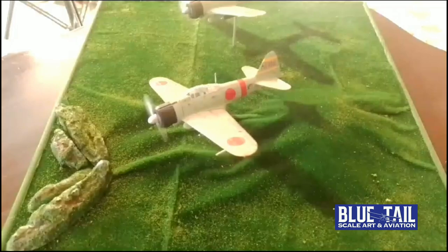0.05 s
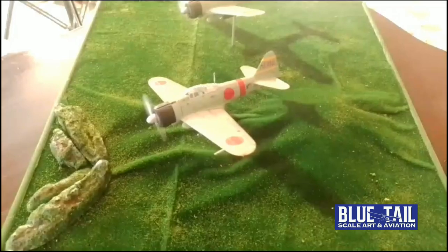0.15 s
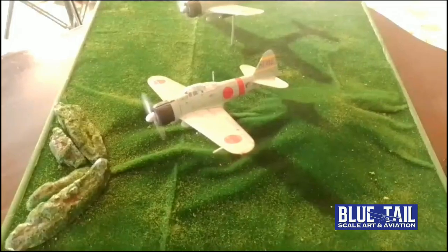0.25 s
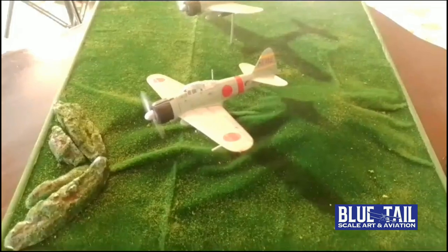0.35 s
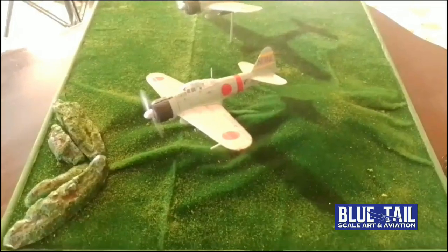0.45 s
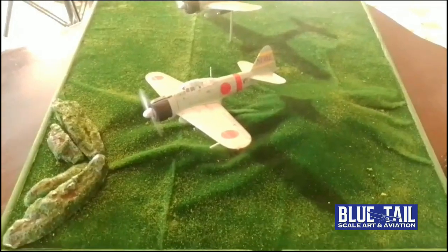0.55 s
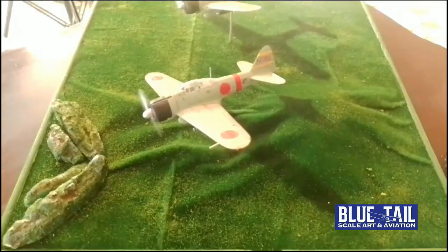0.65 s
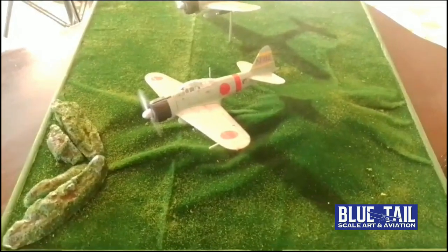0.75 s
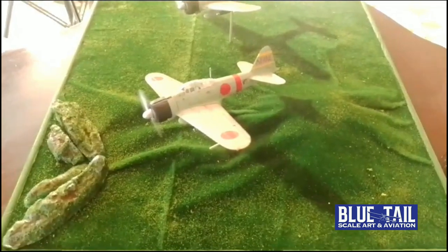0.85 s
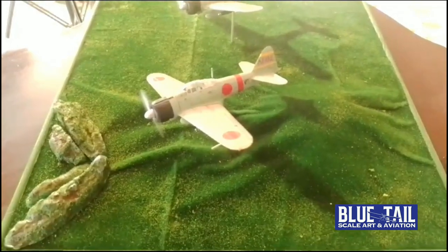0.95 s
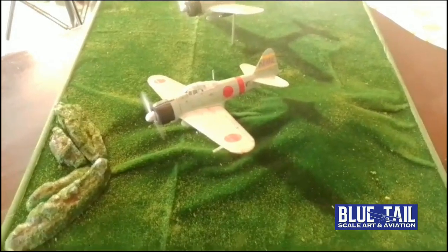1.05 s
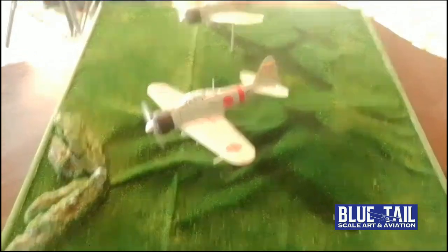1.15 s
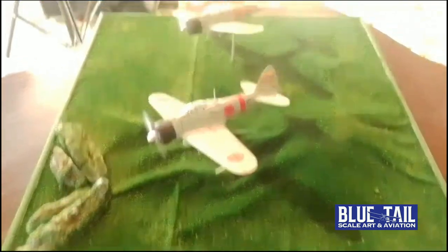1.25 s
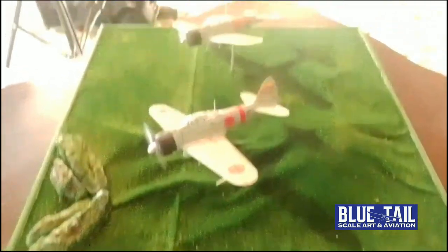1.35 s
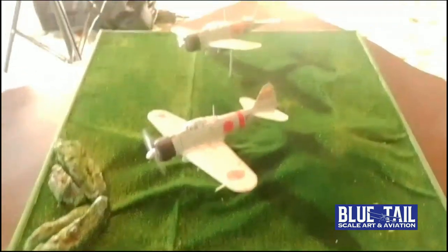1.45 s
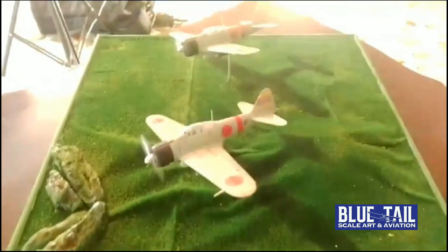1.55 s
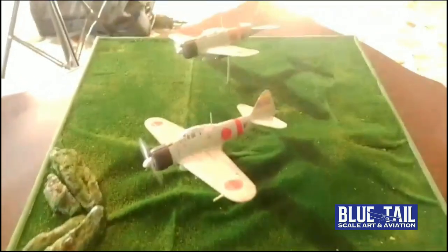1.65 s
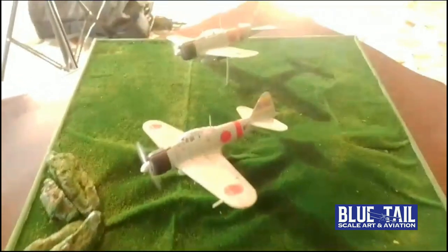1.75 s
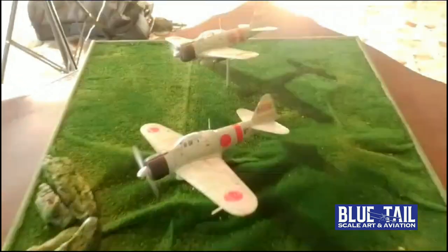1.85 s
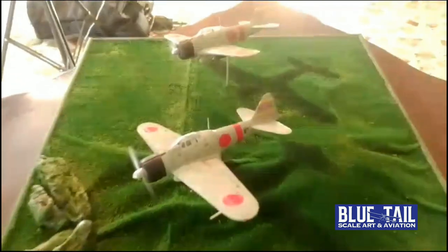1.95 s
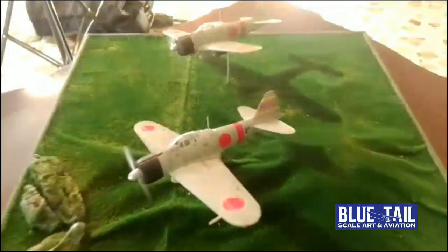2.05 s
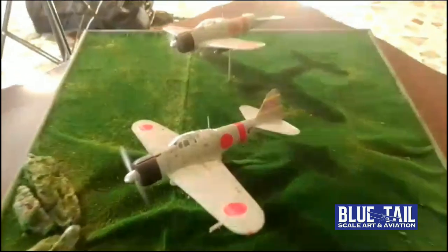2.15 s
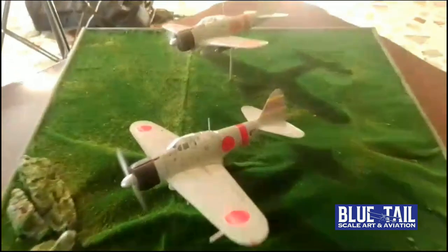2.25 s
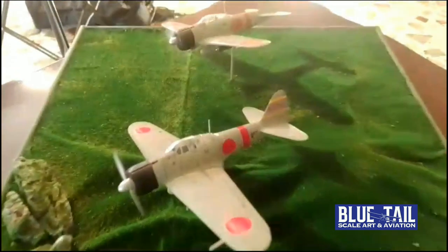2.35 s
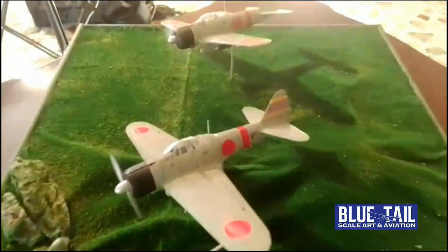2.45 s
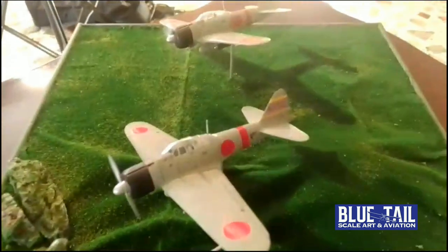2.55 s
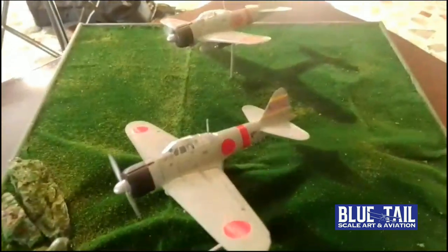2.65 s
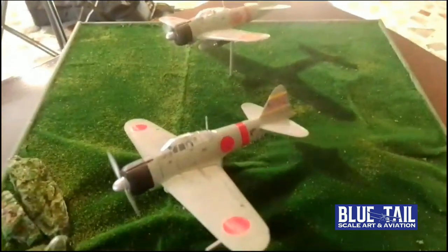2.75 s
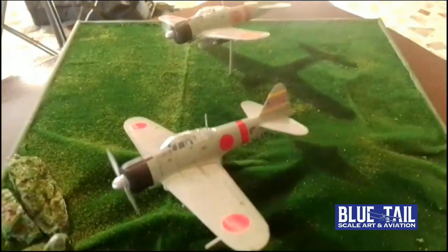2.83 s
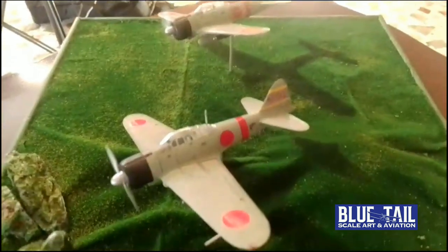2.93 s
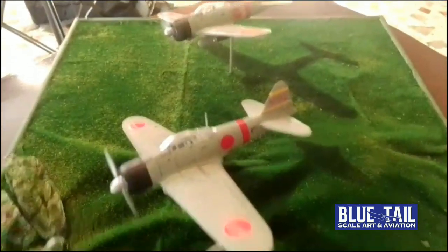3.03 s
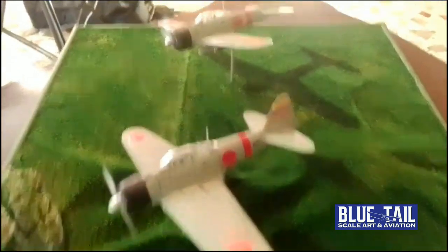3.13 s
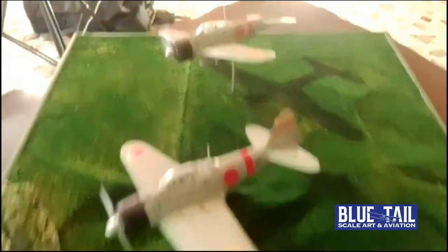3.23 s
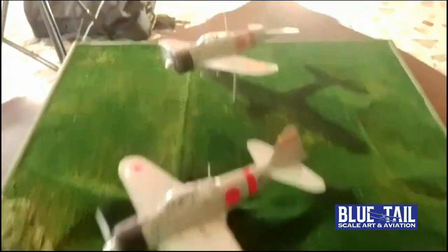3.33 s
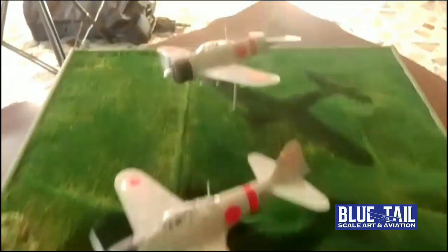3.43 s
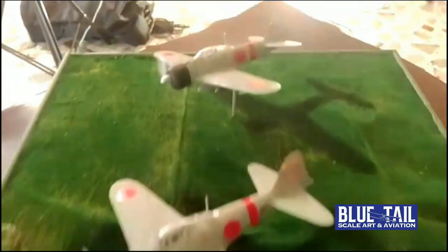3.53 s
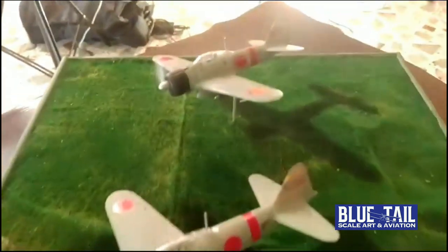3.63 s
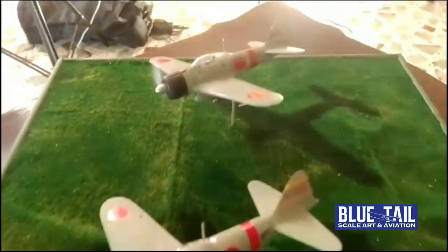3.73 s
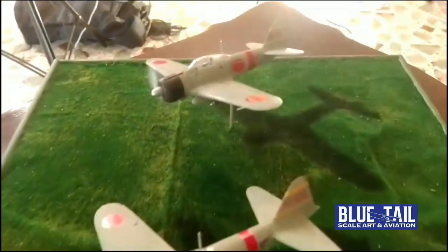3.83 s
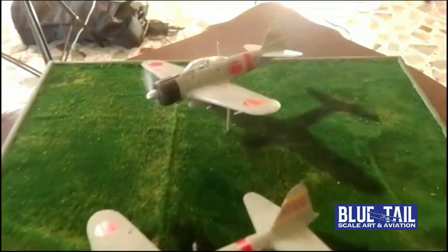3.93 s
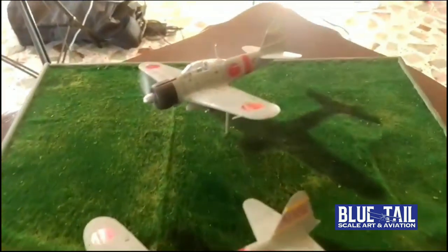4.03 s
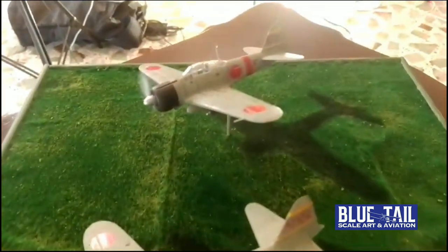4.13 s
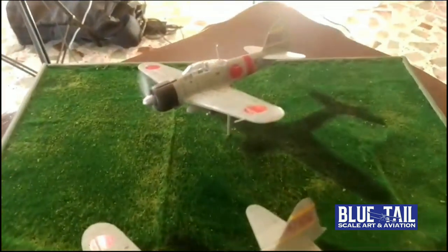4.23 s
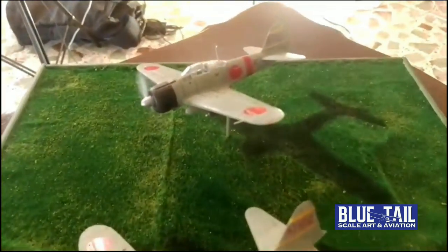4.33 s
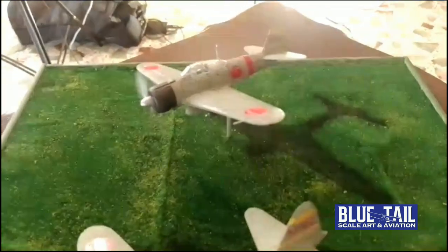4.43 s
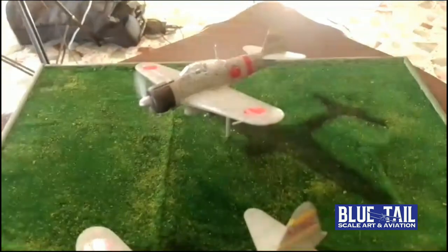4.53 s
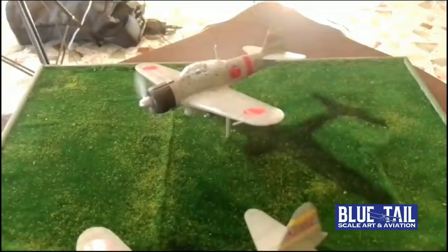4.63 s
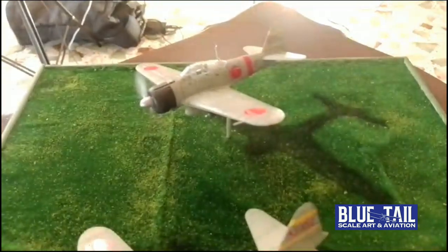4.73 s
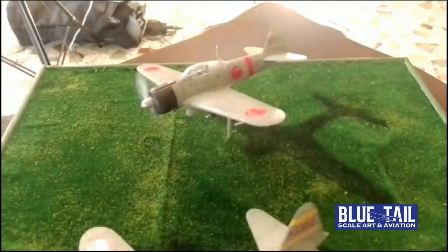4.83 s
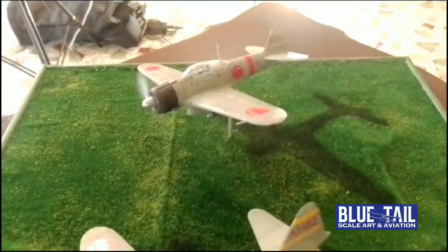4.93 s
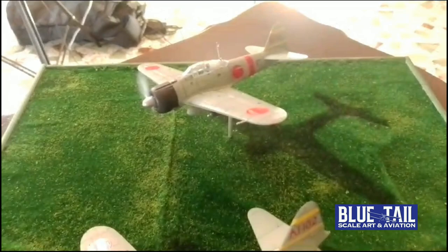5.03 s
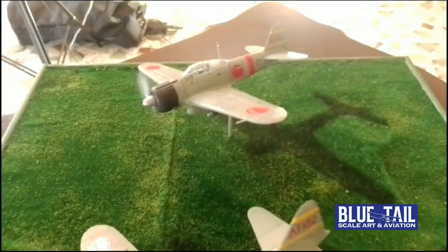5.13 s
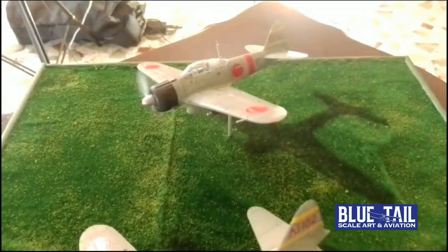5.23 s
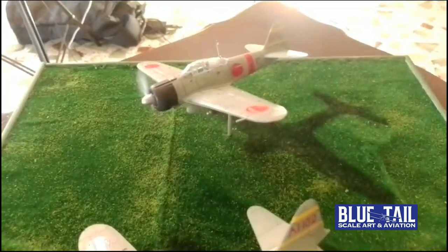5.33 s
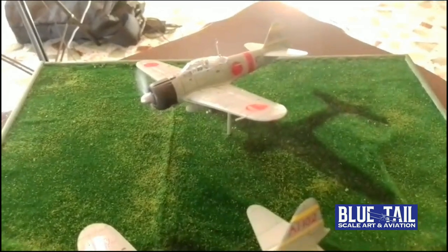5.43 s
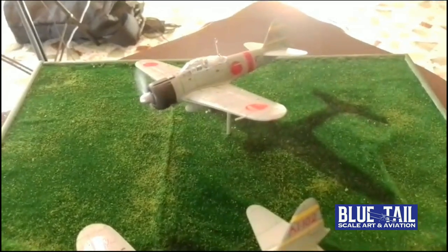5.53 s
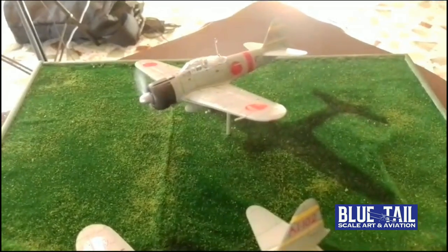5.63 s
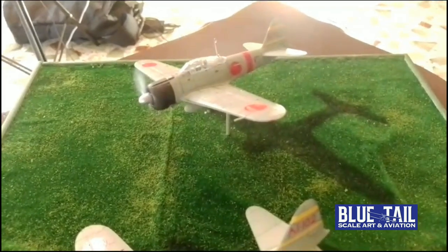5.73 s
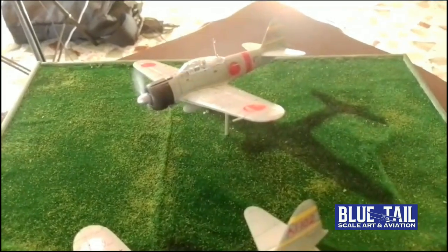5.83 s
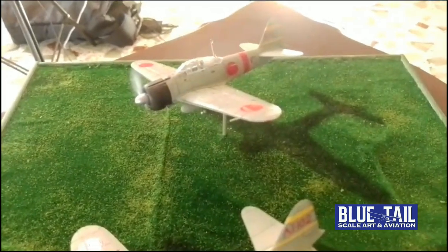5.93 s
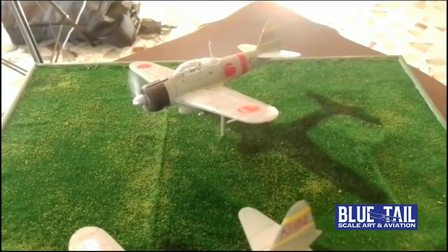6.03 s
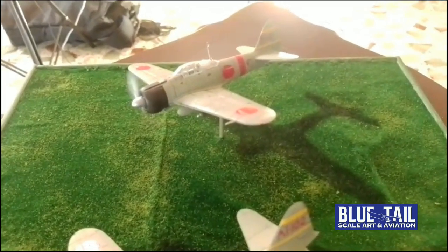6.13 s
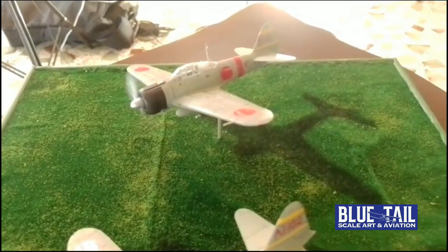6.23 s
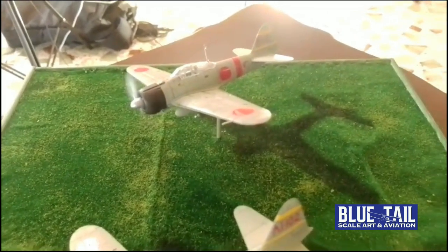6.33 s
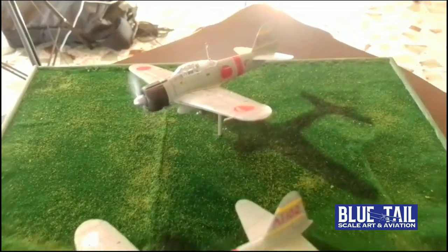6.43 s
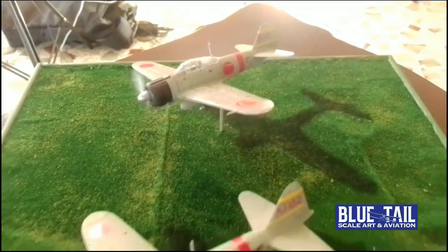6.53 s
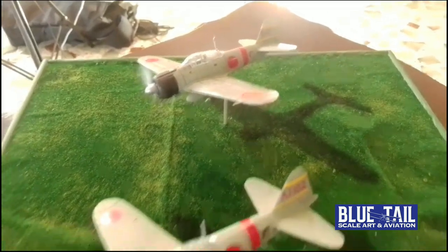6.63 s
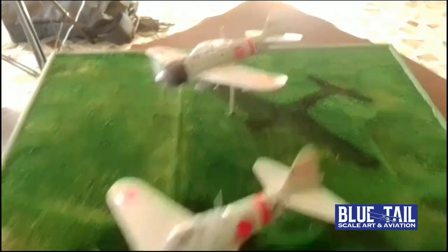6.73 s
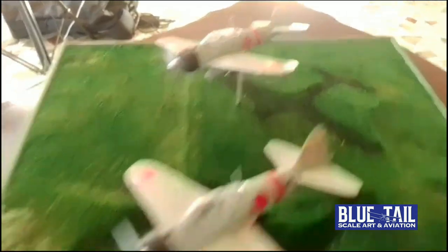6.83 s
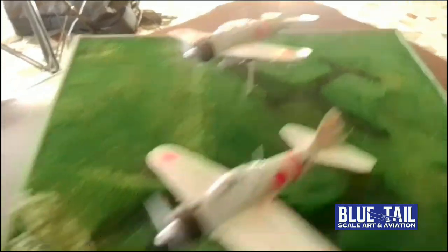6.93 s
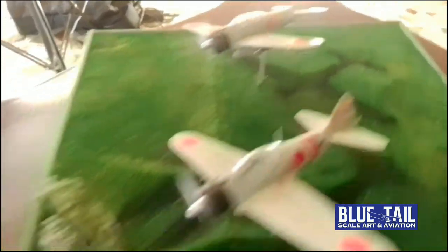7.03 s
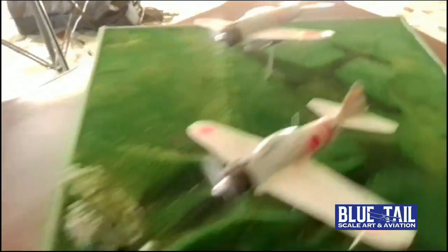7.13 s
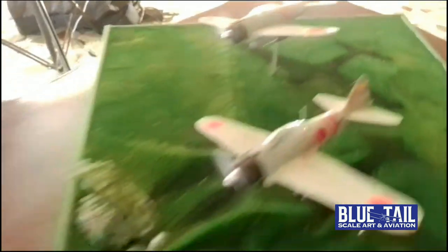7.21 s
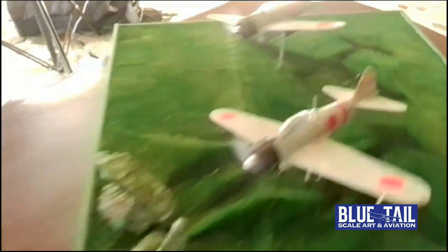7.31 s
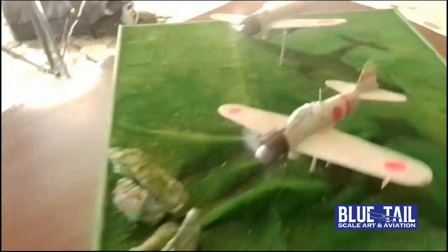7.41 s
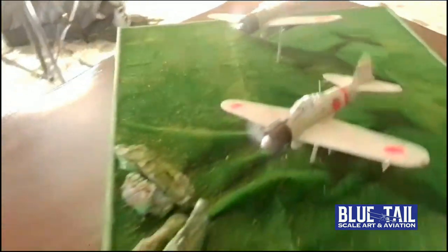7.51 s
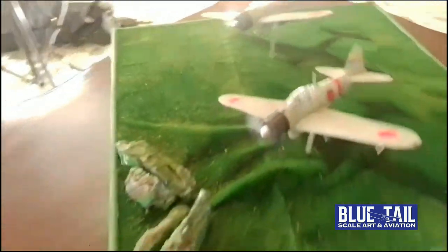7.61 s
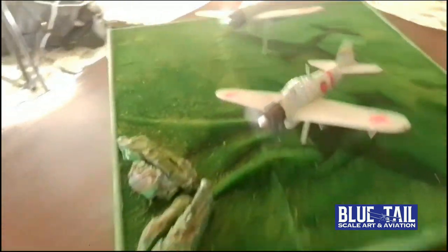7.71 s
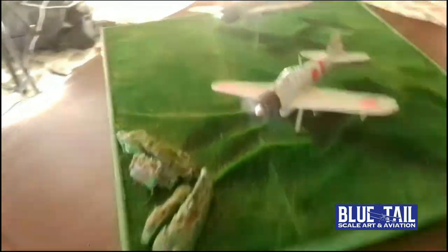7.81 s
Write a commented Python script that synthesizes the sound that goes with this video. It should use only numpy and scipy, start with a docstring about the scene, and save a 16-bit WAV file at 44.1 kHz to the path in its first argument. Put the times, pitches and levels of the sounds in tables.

```python
"""A small, quiet room, close to two plastic model aircraft whose propellers spin on electric motors.
Each shaft knocks and scrapes in its bearing on every turn and rings the thin shell of its model:
a bright buzz with a faint whine from the fast one, a coarser rattle from the slow one.
As the microphone moves over them, different parts of the shells come into earshot.
Now and then a shudder shakes the stand and the motor mount."""
import sys
import numpy as np
from scipy import signal
from scipy.io import wavfile
from scipy.ndimage import uniform_filter1d

SR = 44100
rng = np.random.default_rng(int(sys.argv[2]) if len(sys.argv) > 2 else 0)


def pcm_store(signal):
    """Save signal as 16-bit PCM."""
    levels = np.round(np.clip(np.atleast_2d(signal), -1, 1) * 32767)
    wavfile.write(sys.argv[1], SR, levels.astype(np.int16).T)


N = 347067
TIME = np.arange(N) / SR


def fast_model(shudder):
    """One contact a turn: it scrapes in the motor can, hisses in the brushes and knocks on the shell."""
    # Shaft speed (time [s], speed [turns/s])
    shaft_speed = [(0.7, 126.8), (1.72, 126.9), (1.9, 129.3), (2.0, 135), (3.85, 134.3), (3.97, 136.5),
                   (4.2, 132.6), (5.5, 133.3), (5.65, 138.3), (5.8, 139.3), (6.35, 137.5), (6.52, 134.5),
                   (6.75, 133.9), (7.08, 135.1), (7.45, 140.5), (7.65, 138.9), (7.87, 139.5)]
    # Levels of motor can and brushes over time (time [s], level [dB])
    can_db = [(0.7, -26.5), (1.3, -26), (1.7, -23), (2.08, -31.5), (3.1, -35), (3.62, -24.5), (3.9, -34),
              (4.4, -27.5), (6.8, -29), (6.98, -21), (7.11, -32), (7.24, -24), (7.4, -26.5), (7.87, -23)]
    brush_db = [(0.7, -33.5), (1.3, -35.5), (1.9, -34), (2.1, -39), (3.2, -37), (4, -36.5), (5, -29.5),
                (7.87, -37)]
    # Resonances of each part (pitch [Hz], width [Hz], level [dB])
    can_modes = [(11607, 630, -0.5), (11890, 150, -17)]
    brush_modes = [(12520, 4770, 3), (9710, 4200, -3.5)]
    mount_modes = [(4334, 80, -1.5), (4540, 120, -11)]
    spinner_modes = [(14470, 680, 0.5), (12300, 600, -25)]
    hub_modes = [(12530, 460, -0.84)]
    wing_modes = [(8870, 400, 2), (8530, 420, -17), (9450, 560, -11), (5205, 102, -8), (5200, 310, -23),
                  (5860, 150, -9.5), (11100, 280, -6), (847, 45, -17.5), (1540, 97, -46)]
    flap_modes = [(5944, 140, 0), (10620, 150, 2.5), (1484, 130, -16)]
    cowl_modes = [(9314, 130, 1), (8830, 190, -4), (5805, 150, -1.5)]
    nose_modes = [(4280, 520, -3), (3690, 160, -8.5)]
    speed = curve(shaft_speed)
    turns = np.cumsum(speed * (1 + .003 * wander())) / SR
    once = [(0, 0)]
    scraping = rattle(turns, once, jitter=.0253, scatter_db=1.5, scrape_ms=.7, knock_db=-2.5, rub=.84)
    sliding = rattle(turns, once, jitter=.02, scatter_db=3.5, scrape_ms=1, knock_db=-23, rub=.97)
    tapping = rattle(turns, once, jitter=.025, scatter_db=1.9, scrape_ms=.25, knock_db=9, rub=.2)
    tight = rattle(turns, once, jitter=.0035, scatter_db=.3, scrape_ms=.98, knock_db=3.5, rub=.17)
    can = ring(scraping, can_modes) * undb(curve(can_db))
    brushes = ring(sliding, brush_modes) * undb(curve(brush_db))
    mount = ring(tight, mount_modes) * np.hypot(heard("mount"), shudder)
    # As the shaft speeds up, the buzz shifts from the spinner to the hub.
    overspeed = speed - 133
    spinner = ring(tapping, spinner_modes) * heard("spinner", edge=3.4) * undb(-1.6 * overspeed)
    hub = ring(tapping, hub_modes) * heard("hub") * undb(.5 * overspeed)
    parts = [(tight, wing_modes, "wing"), (tight, flap_modes, "flap"),
             (tight, cowl_modes, "cowl"), (tapping, nose_modes, "nose")]
    loose = sum(ring(drive, modes) * heard(part) for drive, modes, part in parts)
    return can + brushes + mount + spinner + hub + loose + whine(turns)


def slow_model(shudder):
    """Three uneven contacts a turn over a rubbing hiss; the stand takes the blows, loose parts chatter."""
    # Shaft speed (time [s], speed [turns/s])
    shaft_speed = [(0.7, 56.6), (2, 57.17), (2.9, 57.73), (4.4, 58.27), (5.3, 57.85), (5.7, 58.83),
                   (6.6, 58.68), (7.3, 59.77), (7.87, 59.48)]
    # Where the shaft strikes (position [turns], level [dB])
    contacts = [(0, -5.5), (.44, -5), (.56, -8.5)]
    # Level of the bearing and its hiss over time (time [s], level [dB])
    bearing_db = [(0.7, -29.5), (2.1, -30.5), (2.9, -29), (7.87, -28.5)]
    # Resonances of each part (pitch [Hz], width [Hz], level [dB])
    bearing_modes = [(8070, 670, -3.5), (7386, 423, -7), (6846, 406, -6), (3702, 113, -27),
                     (1330, 274, -29), (1740, 106, -38), (805.5, 62, -26.5)]
    rubbing_modes = [(7685, 2200, -10), (4920, 2620, -18), (2030, 2400, -29), (552, 310, -37.5)]
    stand_modes = [(516.3, 54, -1), (406.8, 21.5, -12), (410, 306, -20)]
    fuselage_modes = [(1380.5, 80, 1.5), (1707, 46, -5.5), (2057, 137, -5.5), (1061, 30, -19),
                      (3630, 110, -11), (4026, 140, -8.5)]
    wheel_modes = [(4430, 280, -4.5), (3197, 30, -6.5), (3605, 90, -2), (2590, 12, -19), (3050, 24, -21)]
    tail_modes = [(10560, 315, -0.5), (5975, 160, -6.5), (5500, 110, -14.5), (11410, 620, 3.5)]
    canopy_modes = [(12960, 460, -0.5), (11600, 140, -24)]
    strut_modes = [(4990, 180, 0.46), (8300, 370, 0.00038)]
    turns = np.cumsum(curve(shaft_speed)) / SR
    shaft = rattle(turns, contacts, jitter=.0121, scatter_db=2, scrape_ms=.6, knock_db=1.5, rub=.7)
    rubbing = rattle(turns, contacts, jitter=.027, scatter_db=3, scrape_ms=1, knock_db=-32, rub=2.5)
    blows = rattle(turns, contacts, jitter=.015, scatter_db=3, scrape_ms=.74, knock_db=-1, rub=.31)
    chatter = rattle(turns, contacts, jitter=.0181, scatter_db=2.5, scrape_ms=.47, knock_db=-3, rub=.58)
    bearing = ring(shaft, bearing_modes) + ring(rubbing, rubbing_modes)
    bearing *= undb(curve(bearing_db)) * waver(depth_db=.5)
    stand = ring(blows, stand_modes) * np.hypot(heard("stand", waver_db=2.5), shudder)
    parts = [(fuselage_modes, "fuselage"), (wheel_modes, "wheels"), (tail_modes, "tail"),
             (canopy_modes, "canopy"), (strut_modes, "strut")]
    loose = sum(ring(chatter, modes) * heard(part) for modes, part in parts)
    return bearing + stand + loose


def rattle(turns, contacts, jitter, scatter_db, scrape_ms, knock_db, rub):
    """Each contact gives a knock and a scrape that swells and dies; the shaft rubs on in between."""
    hits = sum(undb(db) * knocks(turns, position, jitter, scatter_db) for position, db in contacts)
    pole = np.exp(-1000 / (scrape_ms * SR))
    pressure = unit(signal.lfilter([1], np.poly([pole, pole]), hits))
    scrape = unit((pressure + rub) * rng.standard_normal(N))
    return scrape + undb(knock_db) * unit(hits)


def knocks(turns, position, jitter, scatter_db):
    """One sharp click a turn, a little early or late (position and jitter in turns)."""
    count = int(turns[-1])
    late, size = rng.standard_normal((count, 2)).T
    gain = undb(scatter_db * np.minimum(size, 1.7))  # no single knock is much louder than the rest
    at = np.interp(np.arange(count) + position + jitter * late, turns, np.arange(N))
    taps = at.astype(int)[:, None] + np.arange(-7, 9)
    offset = taps - at[:, None]
    click = np.sinc(offset) * np.cos(np.pi * offset / 16) ** 2  # can land between samples
    return np.bincount(taps.ravel() % N, (click * gain[:, None]).ravel(), N)


def ring(drive, modes):
    """Clusters of close modes ring as steep-sided bands, each at its own level."""
    out = 0
    for hz, width, db in modes:
        edges = np.clip([hz - width / 2, hz + width / 2], 40, .45 * SR)
        band = signal.butter(4 if width > 280 else 2, edges, "bandpass", fs=SR, output="sos")
        out = out + undb(db) * unit(signal.sosfilt(band, drive))
    return out


def heard(part, waver_db=1, edge=6.1):
    """A part's wavering gain at the moving microphone; a higher edge fades faster outside its spots."""
    # The microphone goes from one model to the other, lingers, and swings back to one side.
    # (time [s], along [0-1], aside [0-1])
    mic_path = [(0.7, 0, 0), (1.1, .03, 0), (1.75, .19, 0), (2.0, .31, 0), (2.5, .42, 0), (3.2, .5, 0),
                (3.6, .65, 0), (3.95, .76, 0), (4.3, .89, 0), (4.8, .99, 0), (6.1, .98, 0), (6.5, .92, .05),
                (6.8, .73, .17), (7.0, .53, .3), (7.25, .38, .48), (7.5, .28, .65), (7.87, .2, .8)]
    # Sweet spots (part, along [0-1], aside [0-1], radius [0-1], level [dB])
    spots = [("mount", 0.086, 0, 0.14, -47), ("mount", 0.522, 0, 0.21, -45.5),
             ("mount", 0.52, 0.33, 0.3, -40.5), ("wing", 0.012, 0, .18, -34), ("flap", .14, 0, 0.088, -41),
             ("cowl", 0.56, 0, .21, -40.5), ("cowl", .63, 0.25, 0.12, -39), ("cowl", .26, .65, 0.22, -52.5),
             ("spinner", 0.98, 0, 0.095, -23.5), ("spinner", .7, 0, .06, -39), ("hub", .92, 0, .27, -31),
             ("hub", .18, .82, .13, -28.5), ("hub", .52, .31, 0.16, -38), ("nose", 0.43, 0.384, 0.18, -38),
             ("fuselage", 0.95, 0, 0.19, -47.5), ("fuselage", 0.695, 0.26, 0.18, -53),
             ("wheels", .99, 0.0092, 0.053, -47), ("tail", 0.95, 0, .19, -34.5),
             ("tail", 0.715, 0, 0.06, -46.5), ("tail", 0.63, 0.24, 0.23, -41),
             ("canopy", 0.866, 0, 0.24, -26), ("canopy", 0.17, .82, 0.16, -21.5),
             ("strut", 0.26, .7, 0.24, -41), ("stand", 0.49, 0.17, 0.65, -61.5),
             ("stand", .98, 0, .08, -58), ("whine 7", 0.065, 0, 0.14, -49),
             ("whine 7", 0.59, 0, .28, -58.5), ("whine 7", .55, .31, 0.14, -53.5),
             ("whine 11", .85, 0, 0.066, -54), ("whine 11", 0.87, 0, 0.11, -65),
             ("whine 11", 0.71, 0.29, 0.23, -47.5), ("whine 12", .11, 0, 0.14, -58)]
    times, along, aside = np.transpose(mic_path)
    place = np.interp(TIME, times, along + 1j * aside)
    power = sum(undb(db) ** 2 / (1 + np.abs((place - x - 1j * y) / radius) ** (2 * edge))
                for name, x, y, radius, db in spots if name == part)
    return np.sqrt(power) * waver(waver_db)


def whine(turns):
    """Thin, clean tones at multiples of the shaft rate, which flutters slightly."""
    flutter = unit(signal.sosfilt(signal.butter(2, 25, fs=SR, output="sos"), rng.standard_normal(N)))
    angle = 2 * np.pi * (turns + .0096 * flutter)
    tone = {order: np.sqrt(2) * np.sin(order * angle) for order in (7, 8, 11, 12, 15)}
    low = tone[7] * heard("whine 7") + tone[8] * undb(-67.5)
    middle = tone[11] * heard("whine 11")
    high = (tone[12] + tone[15] * undb(-8)) * heard("whine 12")
    return low + middle + high


def shudders():
    """Gains for the stand and the motor mount: each shudder swells and dies evenly."""
    # Shudders (middle [s], length [s], stand level [dB], mount level [dB])
    shakes = [(1.66, 0.19, -60, -43), (2.32, 0.25, -61, -44.5), (3.437, .08, -53, -44),
              (3.637, .08, -51.5, -56), (3.976, .08, -54, -58), (4.186, 0.052, -51, -56),
              (4.83, 0.19, -44.5, -46), (5.106, 0.13, -50.5, -48), (5.52, 0.17, -55, -41.5),
              (5.758, 0.16, -50.5, -52), (5.99, 0.12, -51, -54), (6.21, 0.11, -53, -58),
              (7.074, .1, -55, -45)]
    return sum(np.outer(undb(levels), np.exp(-(2 * (TIME - middle) / length) ** 2))
               for middle, length, *levels in shakes)


def room(x, t60_s, wet_db):
    """The small room answers with a short tail."""
    t = TIME[:SR // 2]
    tail = rng.standard_normal(len(t)) * np.exp(-np.log(1000) * t / t60_s) * (t > .004)
    return x + undb(wet_db) * signal.fftconvolve(x, tail / np.linalg.norm(tail))[:N]


def room_tone():
    """A very faint, low bed of air."""
    return ring(rng.standard_normal(N), [(324.4, 208, -72.5), (191, 230, -82.5)])


def waver(depth_db):
    """A gain that drifts by chance."""
    return undb(depth_db * wander())


def wander(steps_per_s=7):
    """Slow drift: random values, held and slewed."""
    hold = int(SR / steps_per_s)
    levels = rng.standard_normal(256)[np.arange(N) // hold % 256]
    return uniform_filter1d(levels, hold)


def undb(db):
    """Decibels to gain."""
    return 10 ** (np.asarray(db) / 20)


def unit(x):
    """Scale to rms 1."""
    return x / np.sqrt(np.mean(x ** 2))


def curve(rows):
    """Join (time [s], value) rows by straight lines."""
    return np.interp(TIME, *np.transpose(rows))


def scene():
    """Both models in the quiet room, in mono."""
    air = room_tone()
    stand_shudder, mount_shudder = shudders()
    models = fast_model(mount_shudder) + slow_model(stand_shudder)
    return (room(models, t60_s=.18, wet_db=-9) + air)[None]


def record(dry):
    """The sound cuts in with the motors already running; the very top is cut off."""
    start_s, fade_s, top_hz = .696, .01, 15500
    opened = dry * np.clip((TIME - start_s) / fade_s, 0, 1)
    return signal.sosfilt(signal.ellip(10, .2, 80, top_hz, fs=SR, output="sos"), opened)


dry = scene()
out = record(dry)
pcm_store(out)
```